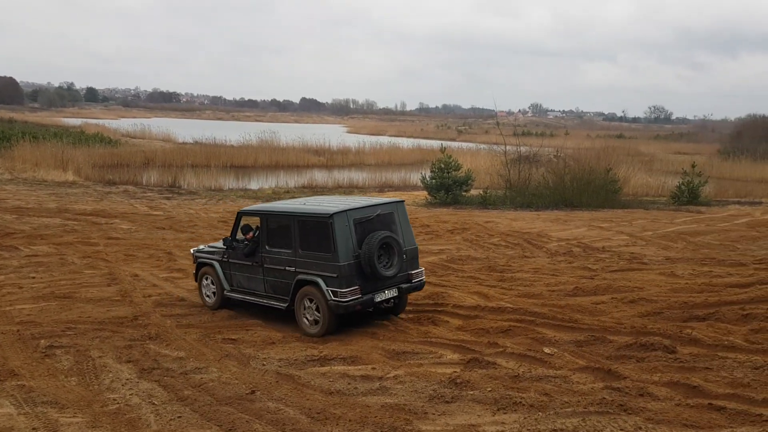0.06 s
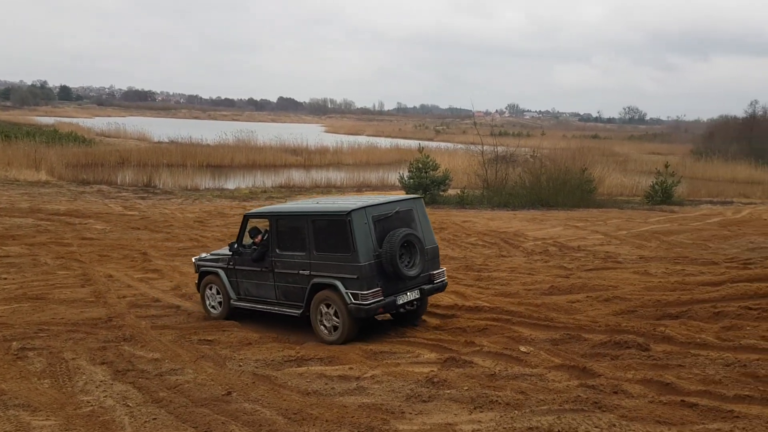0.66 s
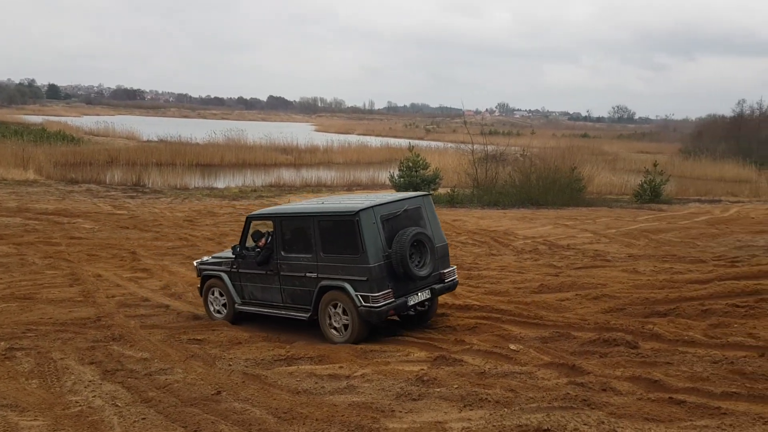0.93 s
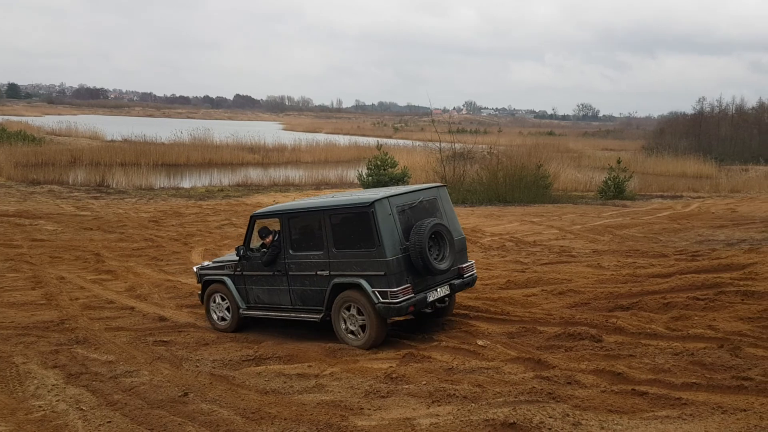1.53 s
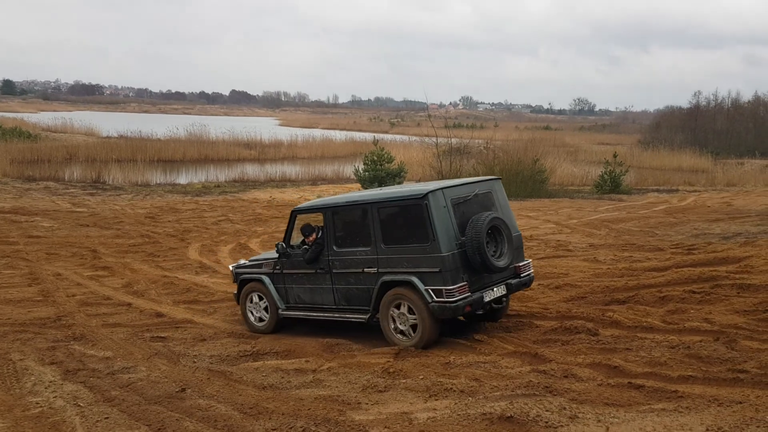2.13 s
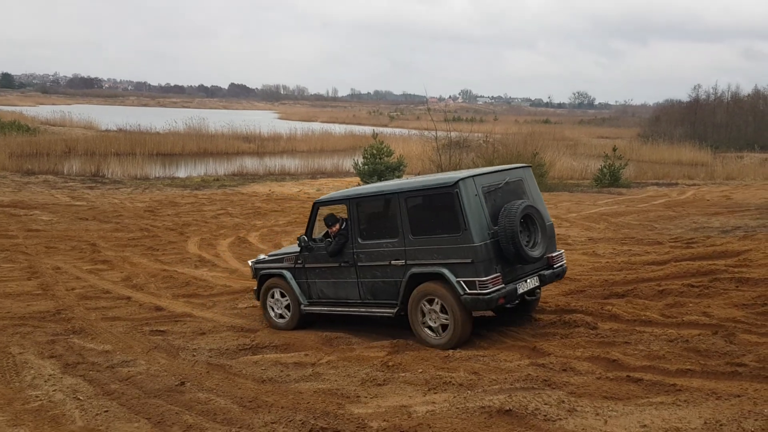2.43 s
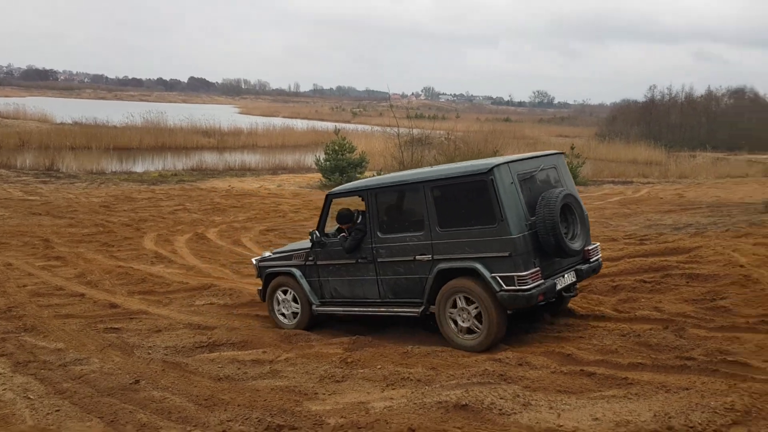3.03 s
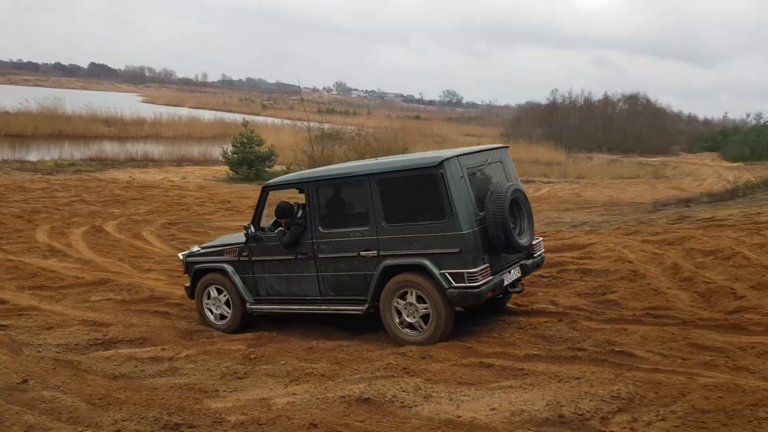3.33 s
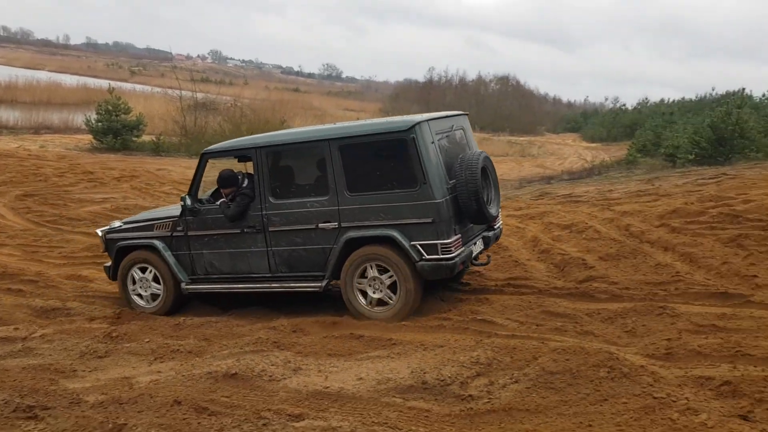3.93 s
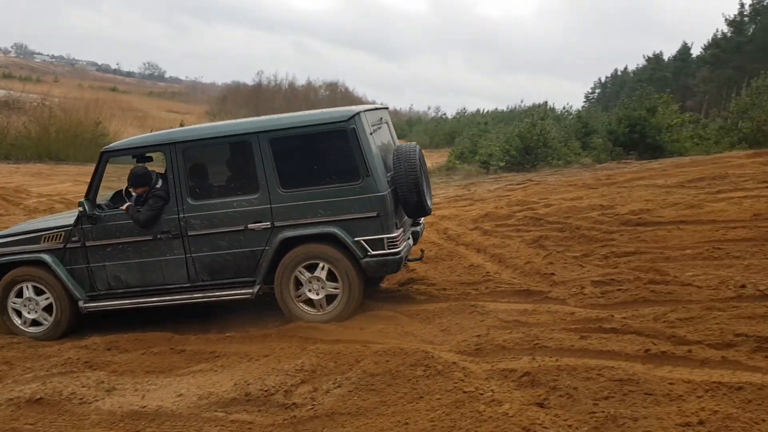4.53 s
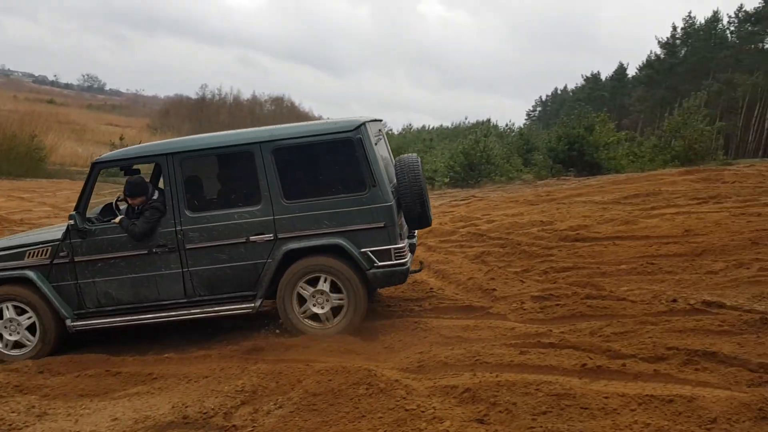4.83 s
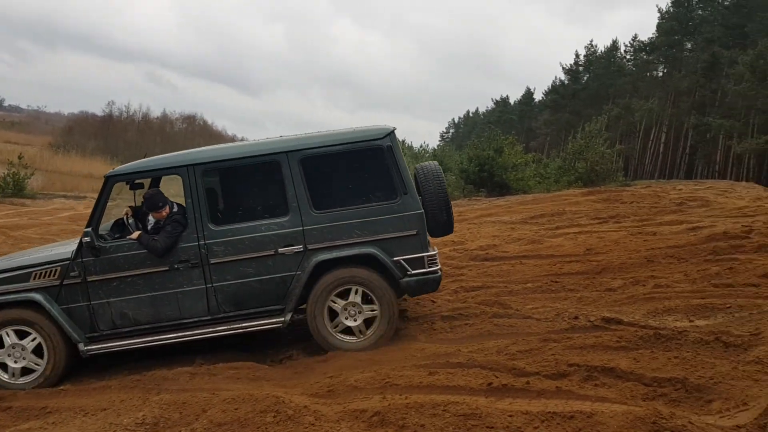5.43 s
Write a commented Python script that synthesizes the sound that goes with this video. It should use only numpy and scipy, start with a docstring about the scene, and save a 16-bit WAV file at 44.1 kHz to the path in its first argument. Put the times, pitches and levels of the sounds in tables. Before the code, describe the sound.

Outdoors, a few metres from the microphone, an off-road vehicle rolls slowly through sand and bumps softly over ruts. Its engine picks up gently, whining faintly, then revs hard and holds a loud, booming drone. As it draws a little closer and digs into a slope, air hisses in the intake, the tyres throw a hissing spray of sand and a low, lumpy rumble builds underneath.

```python
"""On sand at the foot of a slope, a six-cylinder four-wheel-drive crawls a few metres away, turns
side-on and revs up to climb. The exhaust booms at the firing rate, while gears, fan blades and exhaust
overtones whine under load. The engine bay roars, the fan rushes and the intake gulps air, all combed
by a ground echo that sweeps as the car comes closer. Underneath, the tyres spray sand and dust,
the body thumps over ruts and a low, lumpy rumble swells as the wheels churn into the slope."""
import sys
import numpy as np
from scipy import signal
from scipy.fft import rfft, irfft, next_fast_len
from scipy.io import wavfile

SR = 44100
rng = np.random.default_rng(int(sys.argv[2]) if len(sys.argv) > 2 else 0)


def wav_out(sig):
    """Save sig, one row per channel (or a flat mono array), as 16-bit PCM at SR to the path in sys.argv[1]."""
    wavfile.write(sys.argv[1], SR, np.round(np.clip(np.atleast_2d(sig).T, -1, 1) * 32767).astype(np.int16))


N = 250047
TIME = np.arange(N) / SR


def from_db(db):
    """Decibels to gain."""
    return np.exp(np.asarray(db) * (np.log(10) / 20))


def rms_one(x):
    """Scale to unit power."""
    return x / np.sqrt(np.mean(x ** 2) + 1e-20)


def in_time(rows):
    """Read each column of an automation curve at every sample."""
    times, *columns = np.transpose(rows)
    return [np.interp(TIME, times, column) for column in columns]


def at_hz(points, hz):
    """Read a spectrum on a log-frequency axis."""
    freqs, values = np.transpose(points)
    return np.interp(np.log(hz), np.log(freqs), values)


def drift(rate):
    """A random wander of unit power, with `rate` new values a second."""
    knots = rng.standard_normal(4096)
    return rms_one(np.interp(TIME * rate, np.arange(len(knots)), knots))


def colour(pair, spectrum):
    """Shape two unrelated signals into unit-power stereo, narrow in the bass and wide in the treble."""
    # how alike the ears are: (frequency [Hz], correlation [0-1])
    likeness = [(30, .8), (70, .93), (160, .97), (300, .92), (700, .92), (1220, .68), (2000, .42),
                (3300, .38), (5500, .1), (9000, 0), (15000, .1)]
    # lean to the left: (frequency [Hz], left minus right [dB])
    lean = [(60, 1.3), (92, 0.5), (140, 6), (210, 4.8), (330, 2.7), (500, 3.3), (770, 2.0), (1170, 0.55),
            (1790, 0.43), (2740, 4.8), (4190, 0.43), (6410, 3.2), (9810, 1.5), (15000, 2.9)]
    size = next_fast_len(N)
    hz = np.maximum(np.arange(size // 2 + 1) * SR / size, 1)
    mid, side = rfft(pair.astype(np.float32), size)
    alike = at_hz(likeness, hz)
    ears = np.array([[1], [-1]])
    stereo = np.sqrt(1 + alike) * mid + ears * np.sqrt(1 - alike) * side
    in_band = (hz > spectrum[0][0]) & (hz < spectrum[-1][0])
    gain = in_band * from_db(at_hz(spectrum, hz) + ears * at_hz(lean, hz) / 2)
    return rms_one(irfft((stereo * gain).astype(np.complex64), size)[:, :N])


def turning(pair, rear, side, turn):
    """Crossfade from the tail-on to the side-on colour as the car shows its flank."""
    return np.sqrt(1 - turn) * colour(pair, rear) + np.sqrt(turn) * colour(pair, side)


def clatter(cycle, size):
    """Valves, injectors and pistons repeat one rattle every engine cycle: a comb of close lines."""
    pattern = signal.resample(rng.standard_normal((2, size)), size * 8, axis=1)
    position = np.arange(size * 8) / (size * 8)
    return rms_one(np.array([np.interp(cycle, position, row, period=1) for row in pattern]))


def churn(cycle, cycle_depth, crank_depth, firing_depth):
    """Turbulence that swells with each engine cycle, crank turn and firing."""
    angle = 2 * np.pi * cycle
    swell = 1 + cycle_depth * np.cos(angle) + crank_depth * np.sin(2 * angle)
    swell += firing_depth * np.cos(6 * angle)
    return swell * rng.standard_normal((2, N))


def engine_order(cycle, order, waver_db, waver_rate):
    """A sine at a multiple of the engine cycle, its level wavering with the combustion."""
    phase = (order * cycle + rng.random()) % 1
    return np.sqrt(2) * np.sin(2 * np.pi * phase) * from_db(waver_db * drift(waver_rate))


def jet(bursts, spectrum, spread):
    """A compact jet of air or dust: each burst of hiss rises to its peak and dies away."""
    envelope = sum(from_db(peak_db) * np.exp(-np.maximum((at - TIME) / rise, (TIME - at) / fall))
                   for at, peak_db, rise, fall in bursts)
    pair = rng.standard_normal((2, N)) * np.array([[1], [spread]])
    return envelope * colour(pair, spectrum)


def layer_levels(firing_hz, distance_m):
    """Faders in dB for rumble, bay, fan and sand, riding on revs, throttle, strain and nearness."""
    # the driver feeds in power, eases off, floors it and settles: (time [s], throttle [0-1])
    pedal = [(0, 0), (2.12, 0.05), (2.33, .25), (2.72, 0.23), (3.05, 0.49), (3.68, 0.28), (4.1, 1),
             (4.55, 0.68), (5.67, 0.65)]
    # the wheels dig into the slope: (time [s], strain [0-1])
    digging = [(4.5, 0), (4.7, 0.58), (5.1, 0.99), (5.28, 0.57), (5.67, 0.77)]
    # how each fader moves: (crawl [dB], revs [dB/octave], full throttle [dB], full strain [dB])
    rumble_law = (-50, -3, 4, 19)
    bay_law = (-45.5, 14, 5.5, 1)
    fan_law = (-55.5, 10, 14, 4.5)
    sand_law = (-62.6, 11.5, 9, 8)
    throttle, = in_time(pedal)
    strain, = in_time(digging)
    octaves = np.log2(firing_hz / 100)  # above a crawl of 100 firings a second
    near_db = 20 * np.log10(distance_m[0] / distance_m)
    return [crawl_db + revs_db * octaves + throttle_db * throttle + strain_db * strain + near_db
            for crawl_db, revs_db, throttle_db, strain_db in (rumble_law, bay_law, fan_law, sand_law)]


def bumps():
    """Each rut knocks the body's low modes into a short thump."""
    # hits from the ruts: (time [s], gain [dB])
    ruts = [(0.654, -35), (0.723, -33), (0.749, -32), (1.251, -39), (1.411, -32.5), (1.663, -30)]
    # body and suspension modes: (frequency [Hz], level [dB], t60 [s])
    modes = [(62, -16, 0.094), (103, 3, 0.051), (185, -11, 0.035), (355, -22, 0.028)]
    out, age = np.zeros(N), TIME[:SR // 2]
    knock = sum(from_db(level_db - 60 * age / t60) * np.sin(2 * np.pi * hz * age)
                for hz, level_db, t60 in modes)
    for at, gain_db in ruts:
        start = round(at * SR)
        out[start:start + len(knock)] += from_db(gain_db) * knock
    return out


def dust():
    """The finest dust puffs off the slipping tyres, an airy sizzle at the very top."""
    # puffs: (time [s], peak [dB], rise [s], fall [s])
    puffs = [(3.4, -58, .15, .5), (4.4, -41, .12, 0.2), (4.92, -35, 0.14, .16)]
    # colour of the dust: (frequency [Hz], relative level [dB])
    sizzle = [(10000, -18), (12500, -7), (14500, 0), (15850, 2)]
    return jet(puffs, sizzle, spread=0.64)


def sand(level_db, turn):
    """Countless grains thrown by the tyres merge into a slightly lumpy hiss."""
    # colour of the spray, tail-on and side-on: (frequency [Hz], relative level [dB])
    rear = [(4000, -12), (5200, 0), (7000, -3), (9000, 1), (11200, -4.5), (13600, -1), (15850, -5)]
    side = [(4000, -27), (5200, -1), (7300, -3), (9000, -9), (11000, -5), (13000, -3.5), (15200, -4),
            (15850, -6)]
    grains = rng.standard_normal((2, N)) * from_db(0.76 * drift(150) + 0.65 * drift(14))
    return from_db(level_db + 2.0) * turning(grains, rear, side, turn)


def rumble(level_db, turn):
    """A low, lumpy rumble that swells as the wheels churn into the slope."""
    # colour of the rumble, tail-on and side-on: (frequency [Hz], relative level [dB])
    rear = [(15, -26), (40, -10.5), (58, -5), (90, -7), (130, -7.5), (190, -1.5), (250, -6), (310, -16),
            (420, -32)]
    side = [(20, -22), (48, -12), (66, -5.5), (100, 5), (160, -2), (215, 0.5), (260, -2), (330, -17),
            (420, -18)]
    lumps = rng.standard_normal((2, N)) * from_db(0.7 * drift(25))
    return from_db(level_db + 3.0 + 5.2 * turn) * turning(lumps, rear, side, turn)


def intake():
    """Gulps of air hiss in the intake."""
    # gulps: (time [s], peak [dB], rise [s], fall [s])
    gulps = [(4.25, -32.5, 0.29, .18), (5.15, -30, .06, 0.087)]
    # colour of the intake: (frequency [Hz], relative level [dB])
    hiss = [(2800, -17), (3300, 5), (4200, 4), (5000, -8), (6800, -5), (7800, 4), (8500, -1), (9500, -28),
            (11000, -30)]
    return jet(gulps, hiss, spread=0.37)


def fan(cycle, level_db, turn):
    """Air rushes through the cooling fan, with the valve train ticking in it."""
    # colour of the rush, tail-on and side-on: (frequency [Hz], relative level [dB])
    rear = [(1600, 0), (2000, -4.5), (2250, -2), (2650, -7), (3100, -2.5), (3750, -4.5), (4300, -7.5),
            (5000, -16), (5600, -25), (7000, -45)]
    side = [(1600, -10), (2000, 0.5), (2300, -2.5), (2700, -3), (3200, -3), (3850, -2.5), (4600, -6.5),
            (5500, -14), (7000, -42)]
    ticking = turning(clatter(cycle, size=1024), rear, side, turn)
    air = churn(cycle, cycle_depth=0.085, crank_depth=0.089, firing_depth=0.042)
    rush = turning(air, rear, side, turn)
    return from_db(level_db) * (from_db(-10.5) * ticking + from_db(-0.53) * rush)


def engine_bay(cycle, level_db, turn):
    """A mechanical rattle locked to the crank sits inside a turbulent roar."""
    # colour of the bay, tail-on and side-on: (frequency [Hz], relative level [dB])
    rear = [(220, -11), (290, -1.5), (370, -6), (540, 0.5), (680, -2.5), (850, -8), (1130, -6), (1350, -6),
            (1650, -6), (1900, -8), (2150, -12.5), (2600, -50)]
    side = [(220, -12), (330, -10.5), (400, -4), (580, -3), (700, -5.5), (900, -5.5), (1250, -7),
            (1480, -8.5), (1750, -9.5), (1950, -15.5), (2200, -23), (2600, -41)]
    rattle = turning(clatter(cycle, size=512), rear, side, turn)
    air = churn(cycle, cycle_depth=0.064, crank_depth=0.11, firing_depth=0.049)
    roar = turning(air, rear, side, turn)
    return from_db(level_db) * (from_db(-6.0) * rattle + from_db(-2.0) * roar)


def over_ground(direct, distance_m, strength, depth_ms, dull_hz):
    """Add the echo off the sand: it lags more as the car nears, so its comb notches glide."""
    ear_height_m, engine_height_m, sound_m_per_s = 1.6, 1.0, 343
    lag_s = 2 * ear_height_m * engine_height_m / distance_m / sound_m_per_s
    dull = signal.sosfiltfilt(signal.butter(1, dull_hz, fs=SR, output="sos"), direct)
    # sand reflects at its surface and, inverted, just below it
    surface = TIME - lag_s
    below = surface - depth_ms / 1000
    echo = np.array([np.interp(surface, TIME, ear) - np.interp(below, TIME, ear) for ear in dull])
    return direct + strength * echo


def whines(cycle):
    """Gears, fan blades and exhaust overtones sing out and fade as the drive takes up the load."""
    # singing orders: (start [s], end [s], order [per engine cycle], level [dB])
    notes = [(.2, 2.35, 12, -49), (1.75, 2.25, 28.4, -52), (2.2, 2.7, 27, -49), (2.3, 3.5, 11, -46),
             (2.55, 3.4, 18, -47), (2.7, 3.5, 38, -50), (2.6, 3.3, 40, -52), (4.15, 4.95, 12, -37),
             (4.8, 5.67, 12, -44), (4.5, 5.45, 18, -34.5)]
    out = np.zeros(N)
    for start, end, order, level_db in notes:
        progress = np.clip((TIME - start) / (end - start), 0, 1)
        swell = np.sqrt(np.abs(np.sin(np.pi * progress)))
        out += from_db(level_db) * swell * engine_order(cycle, order, waver_db=1.5, waver_rate=22)
    return out


def exhaust(cycle, firing_hz, boom_db, load_db):
    """The firing tone booms; weaker orders swell as they glide through the tailpipe's resonances."""
    # unequal cylinders and firing overtones: (order [per engine cycle], relative level [dB])
    orders = [(2, -5), (3, -8.5), (4, -11), (5, -13.5), (7, -13.5), (8, -9), (10, -14), (20, -4.5),
              (22, -15.5), (24, -8.5), (25, -12.5)]
    # the tailpipe rings near multiples of 195 Hz: (frequency [Hz], gain [dB])
    pipe = [(40, -37), (66, -12), (100, -11.5), (130, -9.5), (195, 3), (240, -10.5), (300, -24), (375, -10),
            (440, -19), (590, -4), (660, -20), (800, -13), (1400, -14)]
    note = from_db(boom_db) * engine_order(cycle, order=6, waver_db=1.0, waver_rate=30)
    for order, level_db in orders:
        gain = from_db(load_db + level_db + at_hz(pipe, firing_hz * order / 6))
        note += gain * engine_order(cycle, order, waver_db=2.0, waver_rate=14)
    return note


def scene():
    """Mix the car as it revs up, comes nearer and turns; one engine cycle clocks all its tones."""
    # a crawl, a first push, then up to a steady climb: (time [s], firing rate [Hz], boom level [dB])
    revs = [(0.0, 101.8, -51.6), (1.3, 97.7, -53.9), (2.1, 107.2, -42.8), (2.5, 123.9, -38.6),
            (2.9, 131.8, -37.7), (3.45, 135.6, -38.4), (3.77, 138.9, -36.2), (4.13, 172.0, -22.9),
            (4.45, 188.3, -21.5), (4.8, 195.6, -14.0), (5.1, 198.5, -11.4), (5.67, 198.1, -14.5)]
    # the car comes nearer: (time [s], distance [m])
    approach = [(0, 7.12), (1.6, 7.02), (3, 6.57), (4.2, 5.78), (4.75, 5.18), (5.67, 4.88)]
    # it shows its flank and takes the slope: (time [s], share side-on [0-1])
    heading = [(0, .035), (3.3, 0.083), (4.7, 0.96), (5.67, .97)]
    firing_hz, boom_db = in_time(revs)
    distance_m, = in_time(approach)
    turn, = in_time(heading)
    rumble_db, bay_db, fan_db, sand_db = layer_levels(firing_hz, distance_m)
    cycle = np.cumsum(firing_hz) / (6 * SR)  # engine cycles elapsed, six firings each
    pan_left = from_db([[0.6], [-0.6]])
    tones = pan_left * (exhaust(cycle, firing_hz, boom_db, load_db=bay_db) + whines(cycle))
    front = engine_bay(cycle, bay_db, turn) + fan(cycle, fan_db, turn) + intake()
    combed_front = over_ground(front, distance_m, strength=0.25, depth_ms=0.15, dull_hz=7900)
    tyres = sand(sand_db, turn) + dust()
    return bumps() + tyres + rumble(rumble_db, turn) + combed_front + tones


def record(dry):
    """Sound reaches the left channel two samples sooner; the top is cut steeply at 15.9 kHz."""
    late_right = np.pad(dry[1], (2, 0))[:N]
    high_cut = signal.ellip(12, .1, 80, 15900, fs=SR, output="sos")
    return signal.sosfilt(high_cut, np.array([dry[0], late_right]))


dry = scene()
out = record(dry)
wav_out(out)
```